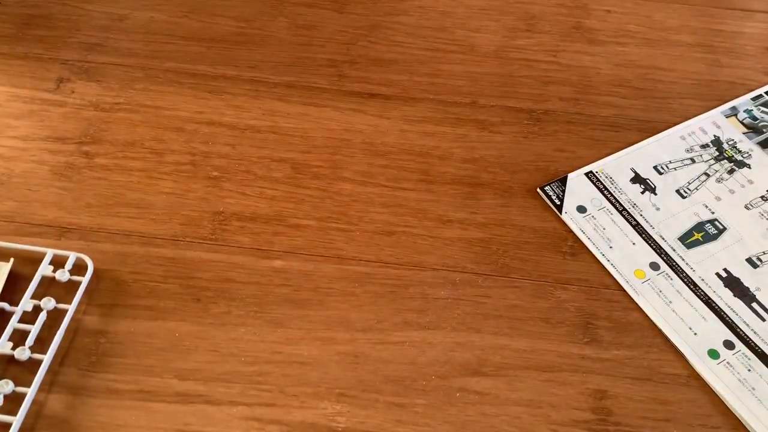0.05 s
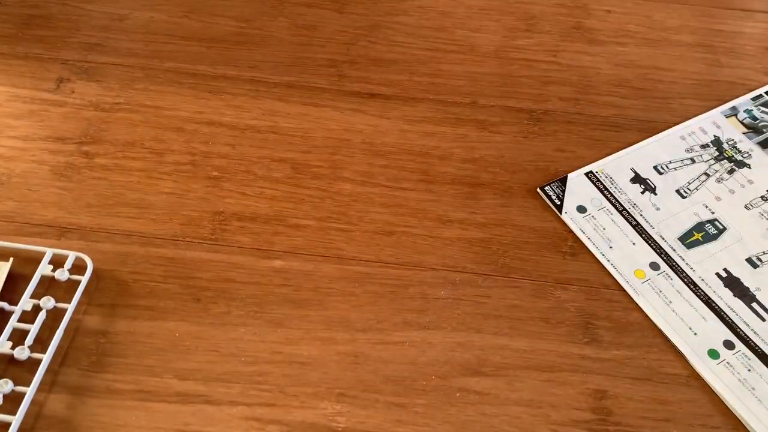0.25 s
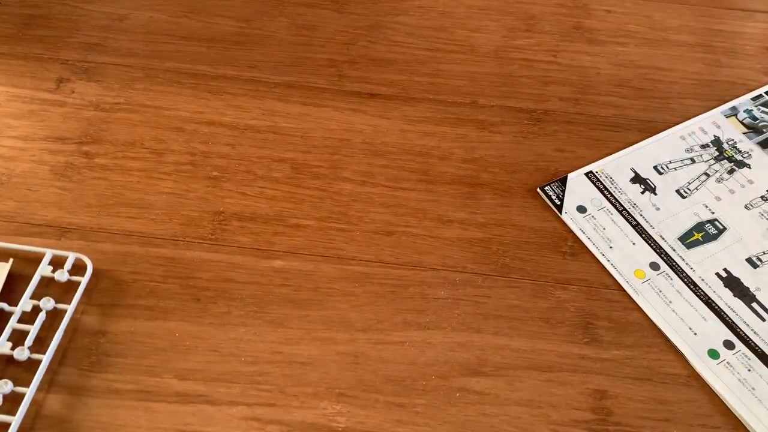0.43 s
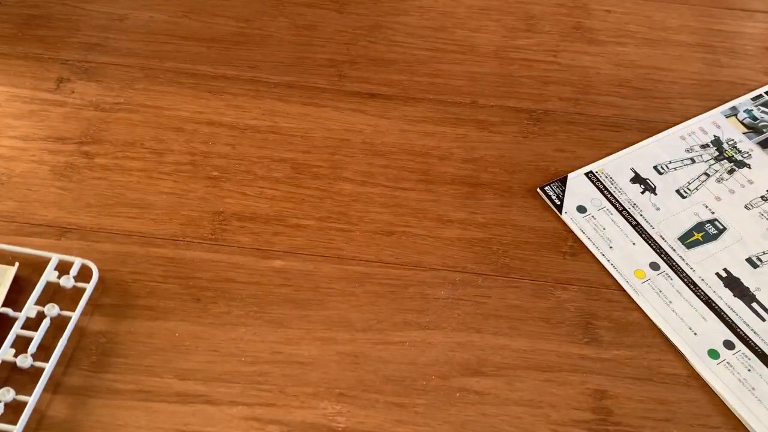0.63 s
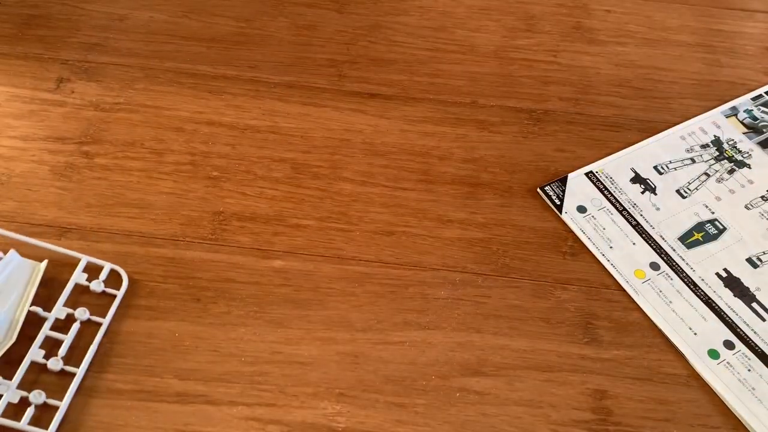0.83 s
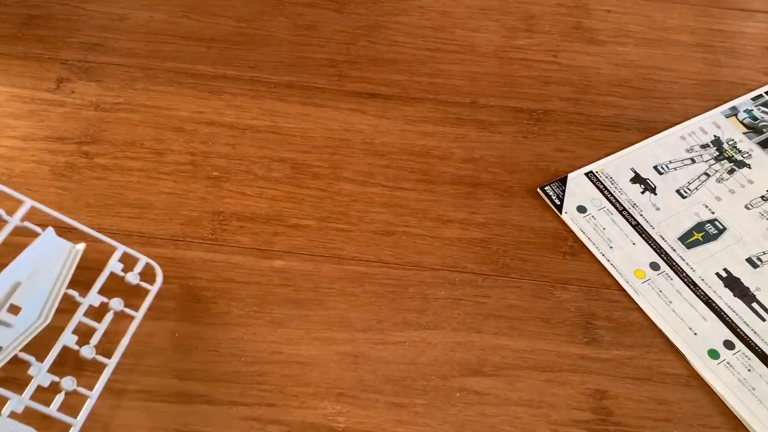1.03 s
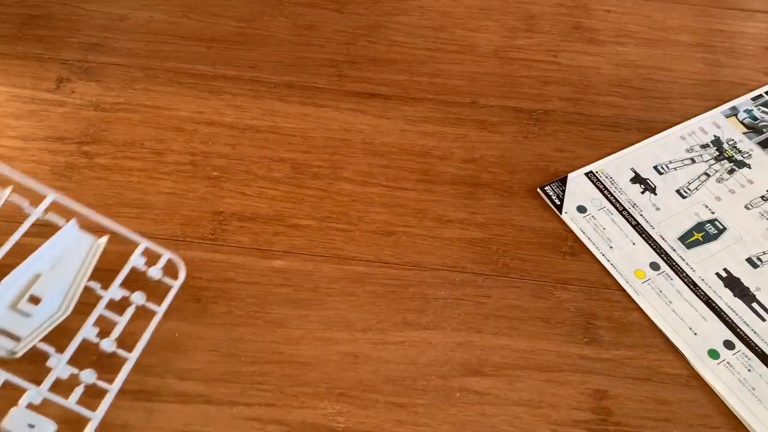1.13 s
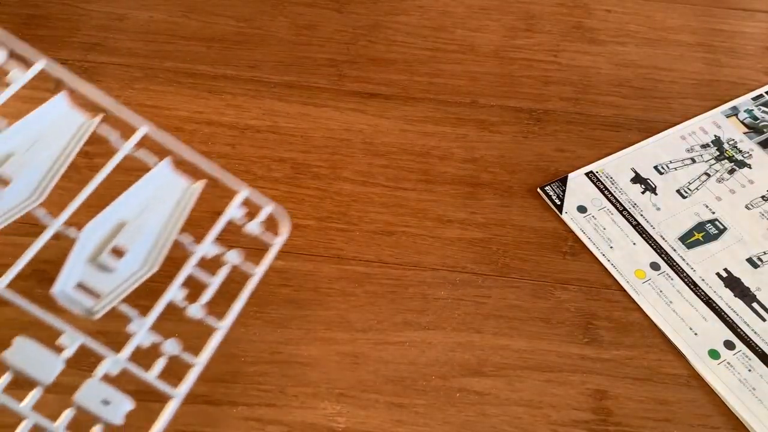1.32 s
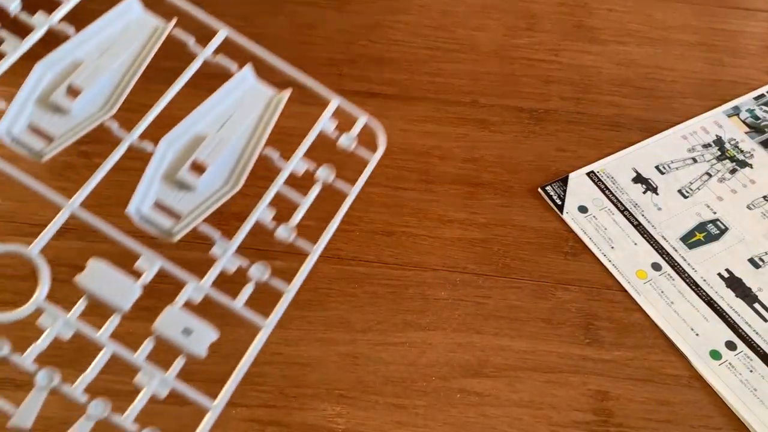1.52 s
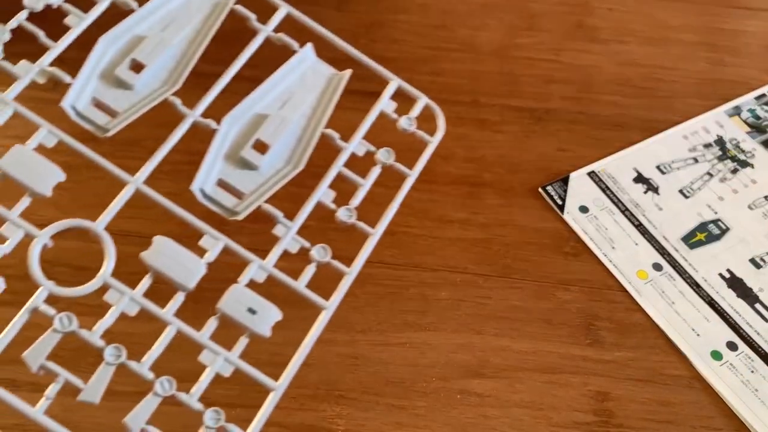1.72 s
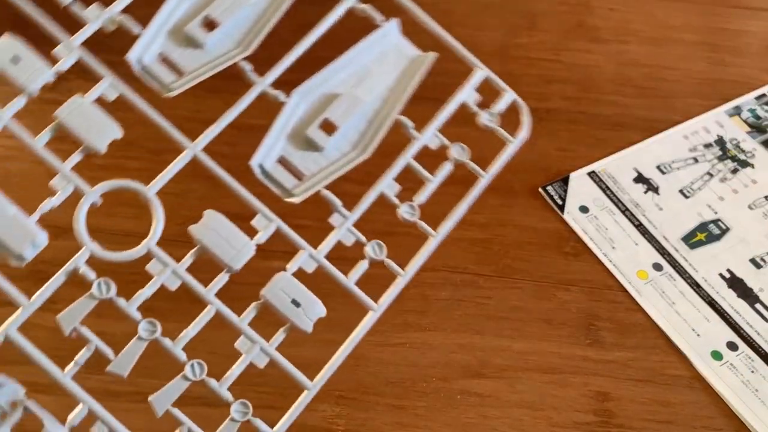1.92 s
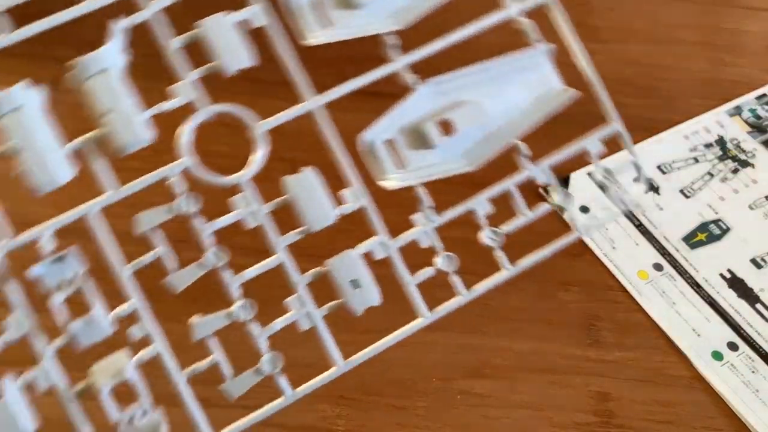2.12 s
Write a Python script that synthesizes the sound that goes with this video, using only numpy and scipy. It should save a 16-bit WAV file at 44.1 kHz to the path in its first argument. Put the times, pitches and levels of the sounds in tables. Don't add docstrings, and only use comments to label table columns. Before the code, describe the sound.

Hard plastic model-kit frames clatter and rattle as they are lifted and moved over a wooden table.

```python
import sys
import numpy as np
from scipy import signal
from scipy.fft import rfft, irfft, next_fast_len
from scipy.io import wavfile
from scipy.ndimage import uniform_filter1d, map_coordinates

SR = 44100
rng = np.random.default_rng(int(sys.argv[2]) if len(sys.argv) > 2 else 0)


def file_out(sig):
    cols = np.atleast_2d(sig).T
    lim = np.clip(cols, -1, 1)
    pcm = np.round(lim * 32767).astype(np.int16)
    wavfile.write(sys.argv[1], SR, pcm)


def volts(x):
    e = np.asarray(x, float) / 20
    return 10 ** e


N = 95167

# (time [s], peak [dB], shell clack re peak [dB], T60 [s])
LIFT_SNAPS = [(0.01, -8.5, -43.5, 0.027), (0.0358, -25, -1, 0.012), (0.0533, -14, -23.5, 0.04),
              (0.0892, -16.5, -30, 0.039), (0.1386, -27.5, -24, 0.073), (0.1795, -19.5, -13, 0.075),
              (0.2192, -16, -35, 0.063), (0.2558, -18.5, -51, 0.048), (0.3172, -14, -36, 0.027),
              (0.3234, -25, -15.5, 0.071), (0.3502, -20.5, -20.5, 0.079), (0.3676, -22.5, -17.5, 0.072),
              (0.3893, -22, -21, 0.11), (0.4743, -22, -20, 0.045), (0.5346, -36, -14.5, 0.068),
              (0.5609, -36, -3.5, 0.023), (0.5851, -28.5, -17, 0.015), (0.726, -24, -14, 0.026),
              (0.7396, -26, -15, 0.042), (0.8348, -33.5, -16, 0.03), (0.853, -32.5, -10.5, 0.027),
              (0.8823, -27.5, -24.5, 0.022)]
# (time [s], peak [dB], shell clack re peak [dB], T60 [s])
CARRY_SNAPS = [(1.1825, -18.5, -14, 0.014), (1.2728, -33, -1, 0.025), (1.6483, -21, -18, 0.027),
               (1.6907, -23, -17.5, 0.07), (1.7327, -20.5, -29, 0.023), (1.7794, -22.5, -20, 0.037),
               (1.7963, -13.5, -48.5, 0.036), (1.8219, -22, -38, 0.023), (1.8554, -24, -39.5, 0.054),
               (1.871, -24.5, -19.5, 0.051), (1.8944, -22, -22, 0.037), (1.9306, -33.5, -2, 0.023),
               (2.0088, -36, -7.5, 0.049), (2.0735, -28.5, -10, 0.025), (2.1012, -14.5, -38, 0.05),
               (2.1259, -11.5, -25.5, 0.045), (2.1439, -18.5, -14.5, 0.066)]
# (time [s], peak [dB], shell clack re peak [dB], T60 [s])
MORE_SNAPS = [
    (1.2108, -10, -28, .014),
    (1.3465, -24, -18, .015),
    (1.383, -40, -8, .012),
    (1.6675, -12.5, -24, .03),
    (1.7096, -19, -12, .018),
]
# (time [s], level [dB], pitch [Hz], T60 [s])
PART_RINGS = [(0.0329, -35, 3360, 0.027), (0.0544, -31, 3350, 0.037), (0.0931, -23.5, 1060, 0.037),
              (0.169, -30, 3000, 0.052), (0.1836, -25.5, 2964, 0.081), (0.206, -29, 1005, 0.038),
              (.238, -39, 2990, .04), (0.327, -31.5, 1406, 0.055), (.344, -29.5, 3710, .05),
              (.365, -33.5, 3220, .05), (.5596, -31, 1050, 0.027), (.5605, -38, 3310, 0.027),
              (0.562, -37, 1830, 0.034), (0.7102, -36.5, 4010, 0.018), (0.7399, -35, 3950, .03),
              (0.7563, -33.5, 2690, .02), (.8555, -37.5, 4190, 0.019), (1.1831, -20, 2887, 0.036),
              (1.19, -34, 3340, .08), (1.212, -33.5, 4500, 0.018), (1.2736, -36, 4320, .02),
              (1.285, -38.5, 3050, 0.057), (1.301, -41.5, 3254, 0.13), (1.3472, -40.5, 2710, 0.059),
              (1.35, -45, 3970, 0.088), (1.382, -45.5, 3400, 0.027), (1.6493, -40.5, 3040, 0.053),
              (1.673, -32, 4300, 0.039), (1.7088, -24, 3940, 0.034), (1.723, -33.5, 3890, 0.045),
              (1.739, -31, 4020, 0.051), (1.7127, -30, 990, 0.042), (1.8715, -33.5, 3130, .03),
              (1.8966, -32.5, 4090, 0.034), (1.93, -27.5, 1040, .04), (1.9313, -29.5, 3043, 0.058),
              (1.962, -33.5, 3060, 0.076), (1.983, -32, 2940, .03), (2.006, -31, 3820, 0.045),
              (2.052, -36, 2920, .04), (2.0716, -30, 2780, .06), (2.1043, -40, 3250, 0.025),
              (2.1162, -34.5, 3040, 0.049), (2.1312, -31, 3680, 0.047), (2.141, -25, 2057, 0.049)]
# (time [s], chatter [dB], shells re chatter [dB], table load re chatter [dB])
RUBBING = [(0, -31.5, 5.5, 1), (0.118, -36.5, -1, -2), (.3, -35, -3, -1), (.41, -38.5, 0.5, 2),
           (.6, -54, 8.5, 5.5), (.69, -65, 12.5, 13.5), (.86, -64, 12.5, 16), (.93, -65.5, 5.5, 16),
           (0.972, -59, 13, -25), (1.05, -72, -4, -36), (1.175, -77, 16, 17.5), (1.189, -53.5, 14, 7.5),
           (1.36, -56.5, 13.5, 18.5), (1.5, -84.5, 2, 7), (1.642, -77, 8.5, -10), (1.662, -31.5, -15, -5.5),
           (1.85, -42.5, 4.5, 3), (2.16, -51, 14.5, 14)]
# (frequency [Hz], level [dB])
ROD_SPECTRUM = [(1500, -17), (4000, -8.5), (6000, -13.5), (8500, 4.5), (11000, 2.5), (15300, 2.5),
                (16900, -15.5)]
# (frequency [Hz], width [Hz], level [dB])
SHELL_MODES = [(1334, 550, 0.5), (2075, 600, -0.5), (3130, 410, -1), (3890, 610, -4), (5120, 1570, -5.5)]
# (time [s], peak [dB], board pitch [Hz], hardness [0-1])
TABLE_KNOCKS = [(0.023, -28.5, 320, 0.13), (0.045, -24, 312, 0.72), (0.144, -29, 268, 1),
                (0.175, -25.5, 284, 0.6), (0.197, -22, 399, 0.7), (0.322, -25.5, 311, 0.9),
                (0.355, -35, 272, 0), (0.476, -32, 270, 0.9), (0.556, -35.5, 295, 1),
                (0.756, -26, 291, 0.66), (1.186, -21.5, 270, 0.97), (1.204, -21.5, 275, 0.72),
                (1.276, -24, 223, 0.75), (1.307, -19.5, 293, 0.43), (1.664, -35, 270, 0.2),
                (1.692, -28, 406, 0.75), (1.876, -26, 293, 0.42), (1.932, -22.5, 256, 0.68),
                (1.987, -24.5, 247, 0.7), (2.017, -31.5, 323, 0.21), (2.132, -25.5, 362, 0.93)]
# (frequency [Hz], T60 [s], level [dB])
TABLE_MODES = [(89.4, .12, -15), (162.7, 0.1, -8.5), (218, 0.051, -4.5), (259.6, 0.055, 5.5),
               (386.3, 0.025, 3.5), (590, 0.038, 0.5), (708, 0.046, -5.5), (879, 0.037, 3),
               (1076, 0.069, -12.5), (1451, 0.1, -12)]
# (time [s], level [dB], softness [0-1])
LANDINGS = [
    (.7572, -34, 0.75),
    (1.1842, -21.5, 0),
    (1.199, -32, 0.2),
    (1.2146, -28.5, .6),
    (1.2764, -34, 0.3),
    (1.29, -37, 0.6),
    (1.305, -31, 1),
    (1.316, -33, .8),
]
# (frequency [Hz], T60 [s], level [dB])
HOLLOW_MODES = [(287.3, 0.08, -8.5), (740, 0.05, -6), (890, 0.04, -1), (960, .03, -6), (1420, 0.025, -7),
                (2200, 0.02, -14), (2885, 0.03, -4)]
# (start [s], length [s], pitch [Hz], level [dB])
CORNER_DRAG = (.818, .055, 312, -42)
# (time [s], level [dB], pitch [Hz])
LOOSE_TICKS = [
    (.905, -44, 2500),
    (1.004, -50, 3000),
    (1.016, -42, 3000),
    (1.0635, -42, 4300),
    (1.075, -47, 5200),
]
# (frequency [Hz], T60 [s])
ROOM_DECAY = [(200, 0.32), (1500, 0.26), (6000, 0.21), (15000, 0.052)]
# (frequency [Hz], level [dB])
AIR_SPECTRUM = [(25, -11.5), (60, -2), (150, -5), (300, -26.5), (700, -36), (3000, -50), (7000, -56),
                (15000, -49)]
# (frequency [Hz], gain [ratio])
PORT_DIFFERENCE = [(100, 0.2), (1000, 0.84), (4000, 1.85), (6800, 2.56), (7600, .4)]
# (frequency [Hz], delay [us])
LEFT_DELAY = [(1000, 335), (3300, 303), (7000, 258.4)]


def unit(x):
    return x / np.sqrt(np.mean(x ** 2) + 1e-20)


def along(points, hz):
    f, v = np.transpose(points)
    return np.interp(np.log(hz + 1), np.log(f + 1), v)


def filtered(x, response):
    m = next_fast_len(N + SR // 2)
    spectrum = rfft(x, m) * response(np.fft.rfftfreq(m, 1 / SR))
    return irfft(spectrum, m)[..., :N]


def wobble(rate_hz):
    knots = rng.standard_normal(int(N * rate_hz / SR) + 4)
    return map_coordinates(knots, [np.arange(N) * rate_hz / SR])


def patchy(x, depth_db):
    z = signal.stft(x, nperseg=128)[2]
    field = uniform_filter1d(rng.standard_normal(z.shape), 3, 0)
    field = uniform_filter1d(field, 7, 1)
    gain = volts(depth_db * unit(field - field.mean(0)))
    return unit(signal.istft(z * gain, nperseg=128)[1][:N])


def contacts(times_s, level_db, rise_s, t60_s):
    t = np.arange(SR // 32) / SR
    fall_db = 60 * t / np.clip(np.c_[t60_s], .004, .06)
    shape = (1 - np.exp(-t / rise_s)) * volts(np.c_[level_db] - fall_db)
    where = (np.c_[times_s] * SR).astype(int) + np.arange(len(t))
    return np.bincount(where.ravel(), shape.ravel(), N + SR)[:N]


def resonance(f, centre_hz, width_hz):
    return 1j * f * width_hz / (centre_hz ** 2 - f * f + 1j * f * width_hz)


def rod_colour(f):
    return volts(along(ROD_SPECTRUM, f))


def shell_ring(f):
    return sum((-1) ** k * volts(db) * resonance(f, hz, width_hz)
               for k, (hz, width_hz, db) in enumerate(SHELL_MODES))


def table_ring(f):
    return sum(volts(db) * resonance(f, hz, 4 / t60_s) for hz, t60_s, db in TABLE_MODES)


def snaps():
    snap_db, clack_gain_db = -1.5, 9.5
    s, db, clack_db, t60_s = np.transpose(list(LIFT_SNAPS) + list(CARRY_SNAPS) + list(MORE_SNAPS))
    grit = volts(2.2 * wobble(2500))
    rods = patchy(filtered(rng.standard_normal(N), rod_colour) * grit, depth_db=3.0)
    push = patchy(rng.standard_normal(N), depth_db=6.5)
    push = push * contacts(s, db + clack_db + clack_gain_db, 0.00098, t60_s)
    return rods * contacts(s, db + snap_db, 0.0026, t60_s) + 3 * filtered(push, shell_ring)


def rings():
    pitch_spread, rise_s, crack_db, crack_t60_s = .07, .0005, -4, .007
    out, t = np.zeros(N + SR), np.arange(SR // 8) / SR
    draws = rng.uniform(-0.95, 1, (len(PART_RINGS), 2, 3, 1))
    for (s, db, hz, t60_s), luck in zip(PART_RINGS, draws):
        pitch_hz = hz * (1 + pitch_spread * luck[0] * [[.2], [1], [1]])
        modes = np.sin(2 * np.pi * pitch_hz * t + np.pi * luck[1]).sum(0) / 2
        modes = modes * volts(-60 * t / t60_s) * (1 - np.exp(-t / rise_s))
        noise = uniform_filter1d(rng.standard_normal(len(t)), size=3) * 2
        crack = volts(crack_db - 60 * t / crack_t60_s) * noise
        out[round(s * SR):][:len(t)] += volts(db) * (crack + modes)
    return out[:N] * volts(3 * wobble(500))


def chatter():
    ticks_per_s, tick_spread_db, tick_t60_s = 1400, 3, .008
    shells_db, table_db = -8.5, -5
    s, *controls = np.transpose(RUBBING)
    level_db, rub_db, weight_db = [np.interp(np.arange(N) / SR, s, c) for c in controls]
    luck = rng.random((3, 2, 3200))
    times_s = np.cumsum(-np.log(1 - luck[:, 0]), 1) / ticks_per_s
    sizes_db = -tick_spread_db * np.log(1 - luck[:, 1])
    crowd = [contacts(when, size_db, 0.00044, [tick_t60_s]) * rng.standard_normal(N)
             for when, size_db in zip(times_s, sizes_db)]
    rods = patchy(filtered(crowd[0], rod_colour), depth_db=-2.0) * volts(1.5 * wobble(39))
    shells = patchy(filtered(crowd[1], shell_ring), depth_db=2.0)
    shells = shells * volts(shells_db + rub_db + 3.7 * wobble(29.73))
    table = unit(filtered(crowd[2], table_ring))
    table = table * volts(table_db + weight_db + 2.1 * wobble(25.94))
    return volts(level_db) * (rods + shells + table)


def knocks():
    knock_db, mode_spread_db, pitch_spread, rise_s = -4.5, 1.92, 0.049, 0.0031
    out, t = np.zeros(N + SR), np.arange(SR // 4) / SR
    hz, t60_s, mode_db = np.transpose(TABLE_MODES)[..., None]
    draws = rng.standard_normal((len(TABLE_KNOCKS), 2, len(TABLE_MODES), 1))
    for (s, db, board_hz, hard), luck in zip(TABLE_KNOCKS, draws):
        tilt_db = 12 * (hard - .5) * np.log2(hz / 450)
        level_db = db + knock_db + mode_db + mode_spread_db * luck[0] + tilt_db
        pitch_hz = hz * (1 + pitch_spread * luck[1])
        pitch_hz[3] = board_hz
        ring = volts(level_db - 60 * t / t60_s) * np.sin(2 * np.pi * pitch_hz * t)
        out[round(s * SR):][:len(t)] += ring.sum(0) * (1 - np.exp(-t / rise_s))
    return out[:N] * volts(3 * wobble(140))


def set_down():
    hz, t60_s, mode_db = np.transpose(HOLLOW_MODES)[..., None]
    out, rough_db = np.zeros(N), 3 * wobble(150)
    for s, db, soft in LANDINGS:
        t = np.clip(np.arange(N) / SR - s, 0, None)
        tilt_db = -7.7 * soft * np.log2(hz / 885)
        level_db = db + mode_db + tilt_db - 60 * t / t60_s + rough_db
        out += (volts(level_db) * np.sin(2 * np.pi * hz * t)).sum(0)
    return out


def corner_drag():
    s, length_s, hz, db = CORNER_DRAG
    u = np.clip((np.arange(N) / SR - s) / length_s, 0, 1)
    swell = np.sqrt(np.abs(np.sin(np.pi * u))) * (u < 1)
    return volts(db) * swell * np.sin(2 * np.pi * hz * length_s * u)


def loose_ticks():
    t = np.arange(N) / SR
    return sum(contacts([s], [db], .0002, [.004]) * np.sin(2 * np.pi * hz * t) for s, db, hz in LOOSE_TICKS)


def room(x):
    out, step = np.zeros((2, N + SR)), SR // 4
    for start in range(0, N, step):
        hz, t, z = signal.stft(rng.standard_normal((2, SR // 2)), SR, nperseg=256)
        decay = volts(-60 * t / along(ROOM_DECAY, hz)[:, None])
        tail = signal.istft(z * decay, SR, nperseg=256)[1]
        wet = signal.fftconvolve(x[None, start:start + step], tail / np.linalg.norm(tail[0]), axes=1)
        out[:, start + 130:][:, :wet.shape[1]] += wet
    return out[:, :N]


def background():
    air_db, hum_hz, hum_db = -54.5, 70, -48.5
    t = np.arange(N) / SR
    noise = rng.standard_normal((2, N))
    air = volts(air_db) * unit(filtered(noise, lambda hz: volts(along(AIR_SPECTRUM, hz))))
    hum = volts(hum_db + 1.5 * wobble(6)) * np.sin(2 * np.pi * hum_hz * t + .3 * wobble(7))
    return air + [[1], [0]] * hum


def scene():
    room_db = -11
    plastic = snaps() + rings() + chatter() + loose_ticks()
    parts = plastic + knocks() + set_down() + corner_drag()
    return [[1], [0]] * parts + volts(room_db) * room(parts) + background()


def low_pass(x):
    return signal.sosfilt(signal.butter(12, 17000, fs=SR, output="sos"), x)


def record(dry):
    top_hz, over_top_db = 15850, -40

    def band(hz):
        return np.where(hz < top_hz, 1, volts(over_top_db))

    def delay(hz):
        return np.exp(-2j * np.pi * hz * along(LEFT_DELAY, hz) * 1e-6)

    shared = filtered(dry[0], band)
    other = filtered(dry[1], lambda hz: along(PORT_DIFFERENCE, hz) * band(hz))
    left = filtered(shared + other, delay)
    right = shared - other
    return low_pass(np.array([left, right]))


dry = scene()
out = record(dry)
file_out(out)
```